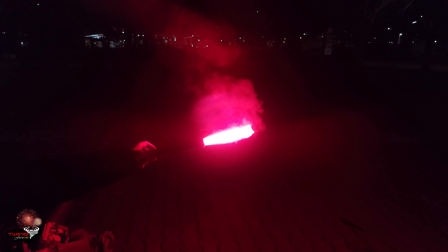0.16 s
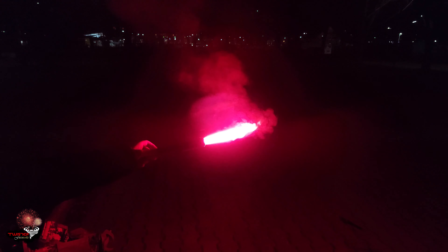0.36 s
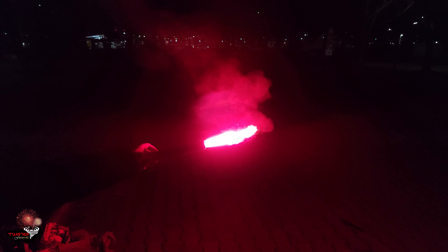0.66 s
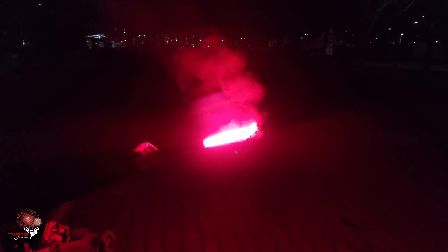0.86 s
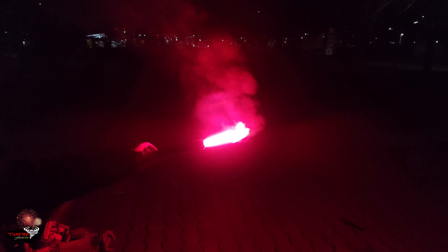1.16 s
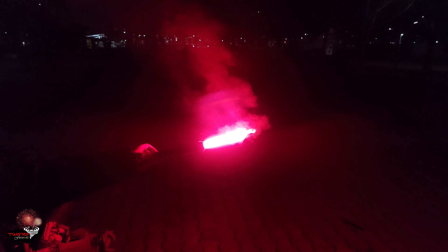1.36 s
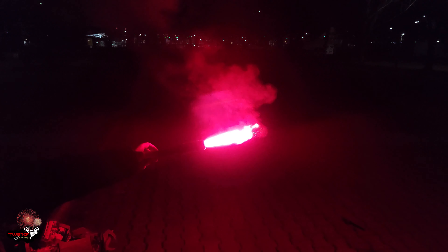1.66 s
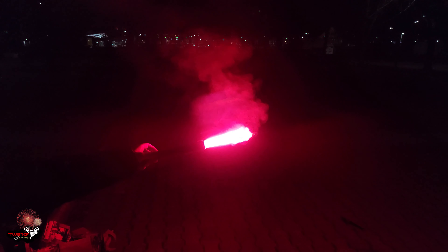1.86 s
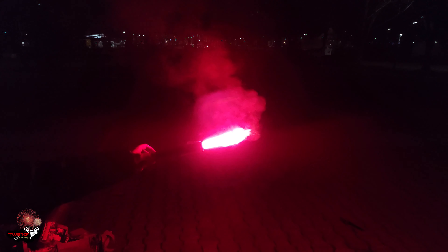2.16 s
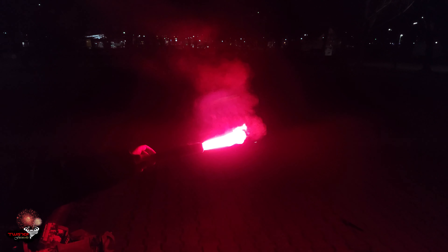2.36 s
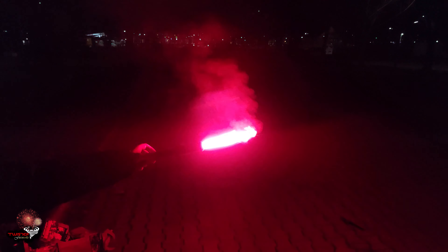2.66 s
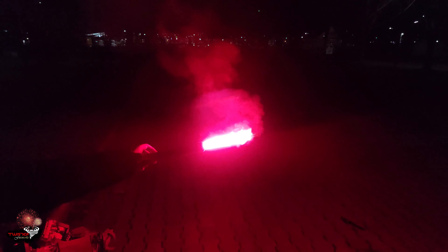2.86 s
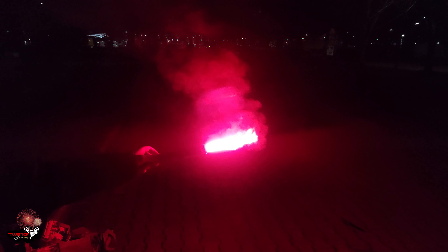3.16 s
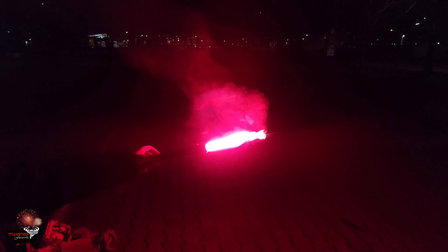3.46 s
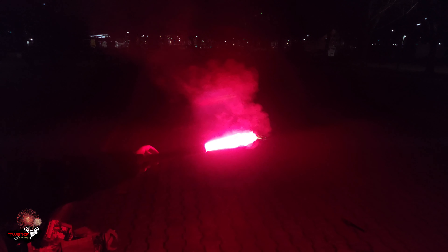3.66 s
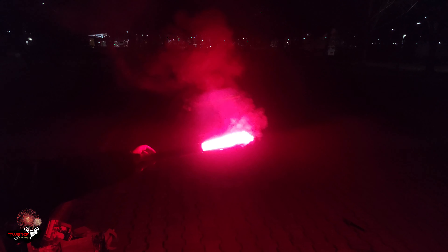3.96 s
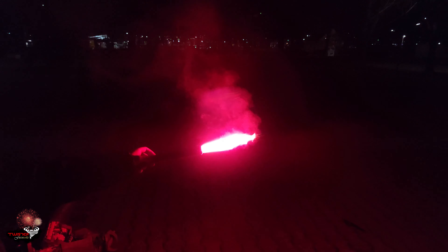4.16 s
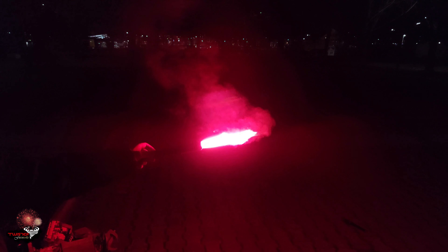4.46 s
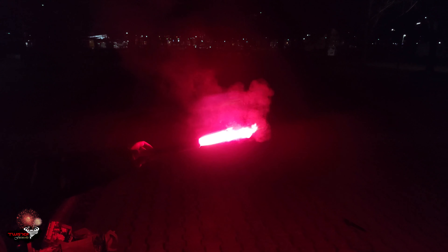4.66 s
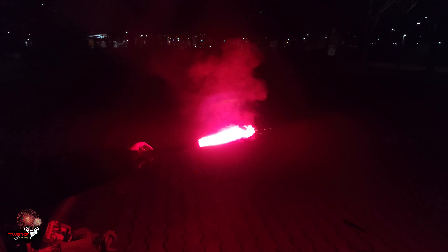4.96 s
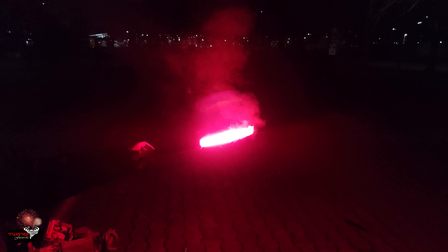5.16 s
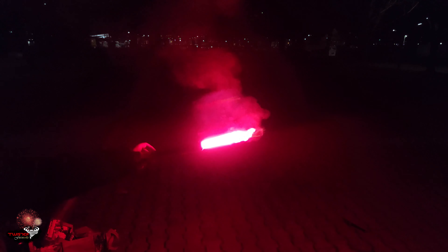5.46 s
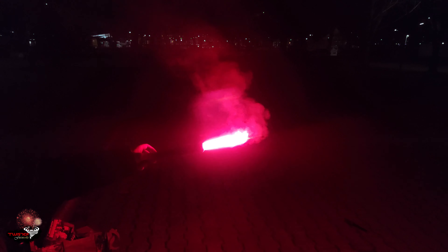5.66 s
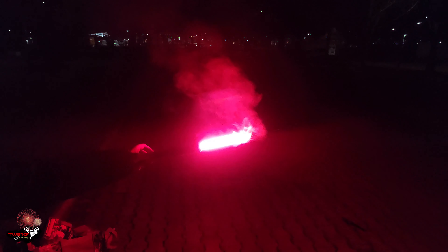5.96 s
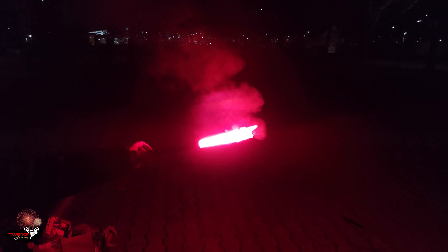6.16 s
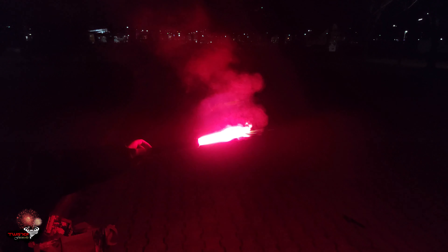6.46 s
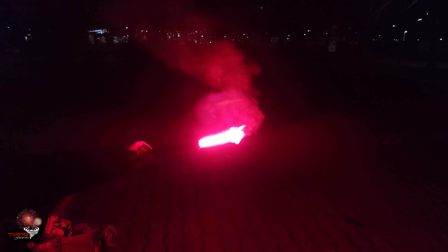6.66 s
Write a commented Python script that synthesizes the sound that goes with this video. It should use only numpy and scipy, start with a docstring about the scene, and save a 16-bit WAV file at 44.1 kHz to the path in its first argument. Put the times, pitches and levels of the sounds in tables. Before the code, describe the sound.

From 0 to about 7 seconds a hand flare burns without pause a few metres away on a paved path outdoors at night. The gas jet gives a rough, airy roar strongest around 1.5 to 3 kHz, with a thinner bright hiss above 4 kHz. Both sputter together very slightly, and the highest treble flutters quickly and randomly. A reflection about 5 milliseconds later colours the rush with a hollow tone that drifts slowly. The roar rises gently and unevenly by a few decibels, with small surges near 5.6 and 6.5 seconds and at the end. Well beneath, a distant town rumbles; soft deep swells come near 1 and 2 seconds, a short thump-like one at 4, and fainter ones near 5.9 and 6.4. A faint low engine drone peaks around 1.8 seconds, then fades. The treble is broad in stereo, the bass nearly central, with a sharp cutoff near 15.7 kHz.

```python
"""A paved path at night: a red hand flare burns a few metres away, a town lies far off.
Flare: coloured noises make the gas jet's roar and hiss, both sputtering together.
A delayed copy off the paving combs them into a hollow tone that drifts as the flare burns down.
Two small microphone ports colour it differently, and the level of each treble region wavers at random.
Town: low noise rumbles and swells, and a two-line engine drone grows and fades."""
import sys
import numpy as np
from scipy.fft import rfft, irfft, next_fast_len
from scipy.io import wavfile
from scipy.ndimage import map_coordinates

SR = 44100
rng = np.random.default_rng(int(sys.argv[2]) if len(sys.argv) > 2 else 0)


def persist_wave(psi):
    """Save psi, clipped to +-1, as 16-bit WAV."""
    counts = np.round(np.clip(psi, -1, 1) * 32767).astype(np.int16)
    wavfile.write(sys.argv[1], SR, np.atleast_2d(counts).T)


N = 300321
TIME = np.arange(N) / SR  # s
SIZE = next_fast_len(N, real=True)
FREQ = np.maximum(np.arange(SIZE // 2 + 1) * SR / SIZE, 1)  # Hz, kept above 0 for the logarithm


def from_db(db):
    """Decibels to amplitude gain."""
    return 10 ** (np.asarray(db) / 20)


def rms_one(x):
    """Scale to unit power over all channels together."""
    return x / np.sqrt(np.mean(x ** 2) + 1e-20)


def over_hz(points):
    """Columns of a table, joined by straight lines over log frequency."""
    hz, *columns = np.transpose(points)
    return np.squeeze([np.interp(np.log(FREQ), np.log(hz), column) for column in columns])


def filtered(x, response):
    """Pass a sound through a frequency response."""
    return irfft(rfft(x, SIZE) * response, SIZE)[..., :N]


def noise(response, channels=1):
    """Unrelated noises of one colour, joint rms 1."""
    white = rng.standard_normal((channels, SIZE))
    coloured = irfft(rfft(white) * response, SIZE)
    return rms_one(coloured[:, :N])


def drift(rate_hz):
    """Random curve, rms 1: low-passed noise."""
    return noise(1 / (1 + (FREQ / rate_hz) ** 2))[0]


def flare():
    """Jet, scattered sound and ground echo, as the two ports pick them up."""
    # sound scattered by hand and case, unrelated at each port: hz, scattered_to_direct_db
    scatter_points = [(250, -15.5), (1500, -12.5), (2450, -11.5), (2820, -6.5), (3200, -10), (3760, -1.5),
                      (4400, 0.5), (4980, -11), (5300, -1.5), (7050, -4), (7500, 4), (7820, -6), (8200, 2),
                      (8600, -13.5), (9680, 11), (11300, -2), (12400, -1), (13500, 6), (14800, 7),
                      (15600, 2)]
    # left port resonances and notches: centre_hz, width_hz, peak_db
    left_resonances = [(3940.0, 420, -7), (5260, 370, 5), (6660.0, 520, -5.5), (7450, 210.0, -9),
                       (9840, 840, -14), (12300, 890.0, 4.5), (14370.0, 1320.0, -6)]
    # right port resonances and notches: centre_hz, width_hz, peak_db
    right_resonances = [(1788, 170, 4.3), (3562, 456, 8), (4050, 120.0, 6.5), (4220.0, 230, -4.5),
                        (5830, 370.0, -6), (7230, 800, 7), (8600, 470, -4.5), (13320.0, 380.0, -5),
                        (14320.0, 1400.0, 9)]
    # phase by which the left port leads: hz, lead_rad
    lead_points = [(800.0, 0.04), (1220.0, 0.73), (1550.0, -0.08), (1900.0, 0.88), (2560.0, 0.31),
                   (2920.0, -1.47), (3200.0, -0.52), (3790.0, -1.52), (4520.0, -3.7), (5180.0, -3.17),
                   (5380.0, -5.09), (5810.0, -3.86), (6090.0, -5.16), (7420.0, -3.68), (7600.0, -2.58),
                   (8310.0, -3.17), (9270.0, -3.22), (9620.0, -4.35), (10250.0, -2.01), (11240.0, -1.42),
                   (12660.0, -2.42), (13020.0, -0.31), (13500.0, -4.2), (15000.0, -3.9), (15370.0, -6.3)]

    gas = burn_down(jet(roar_sputter_db=0.32, hiss_sputter_db=0.47, sputter_hz=22))
    scatter = from_db(over_hz(scatter_points))
    total = np.hypot(1, scatter)  # keeps the summed power
    direct = filtered(gas[0], 1 / total)
    scattered = filtered(gas[1:], scatter / total)
    arriving = direct + scattered
    with_echo = arriving + ground_echo(arriving, sway_ms=0.011)
    wavering = waver_treble(with_echo, depth_db=2.04, rate_hz=19)
    left = port(left_resonances) * np.exp(1j * over_hz(lead_points))
    right = port(right_resonances)
    return filtered(wavering, np.array([left, right]))


def jet(roar_sputter_db, hiss_sputter_db, sputter_hz):
    """Turbulent gas from an unevenly burning charge: one direct and two scattered noises."""
    # colour of the jet's roar: hz, relative_db
    roar_colour = [(60.0, -9.5), (210.0, -6.5), (340.0, -10.5), (520.0, -8.5), (900.0, -6.5),
                   (1360.0, -5.5), (1670.0, -2), (2030.0, -5.5), (2330.0, -0.36), (2790.0, -3.5),
                   (3030.0, -3), (3690.0, -11.5), (4410.0, -19.5), (6500.0, -56.1)]
    # colour of the hiss at the jet's mouth: hz, relative_db
    hiss_colour = [(2000.0, -21), (4290.0, 2.5), (5150.0, -2), (6320.0, 2.5), (7300.0, -0.7),
                   (8280.0, -5.5), (9260.0, -10.5), (10910.0, -2), (12360.0, -4.5), (13140.0, -4.5),
                   (14060.0, -10), (15960.0, -9)]
    # roar grows unevenly as the charge is used up: time_s, level_db (before later colouring)
    roar_level = [(0.2, -40), (0.45, -39), (0.9, -39), (1.1, -38.5), (1.4, -39), (2.1, -38.5), (2.42, -39),
                  (2.65, -38), (3.3, -38), (4.2, -38), (4.9, -37.3), (5.35, -38), (5.6, -36.5),
                  (5.82, -38.4), (6.0, -37.5), (6.5, -36.5), (6.7, -37.5), (6.8, -36)]
    hiss_start_db, hiss_slope_db_per_s = -46.5, -0.04  # before later colouring

    time_s, level_db = np.transpose(roar_level)
    roar_db = np.interp(TIME, time_s, level_db)
    hiss_db = hiss_start_db + hiss_slope_db_per_s * TIME
    sputter = drift(sputter_hz)  # each surge of gas lifts roar and hiss together
    roar_gain = from_db(roar_db + roar_sputter_db * sputter)
    hiss_gain = from_db(hiss_db + hiss_sputter_db * sputter)
    roar = noise(from_db(over_hz(roar_colour)), channels=3) * roar_gain
    hiss = noise(from_db(over_hz(hiss_colour)), channels=3) * hiss_gain
    return roar + hiss


def burn_down(x):
    """Colour changes as the flare burns down: even crossfade from early to late."""
    # change from first to last moment: hz, gain_db
    colour_change = [(330.0, -2.6), (700.0, -2.5), (1200.0, -2.7), (2500.0, -0.1), (3090.0, 0.2),
                     (3750.0, -6.5), (5010.0, -2.5), (6210.0, -1.3), (7420.0, 1), (8520.0, -2),
                     (10290.0, 5.5), (12550.0, 1.5), (14060.0, -5), (15640.0, -5)]
    progress = TIME / TIME[-1]
    half_change = from_db(over_hz(colour_change) / 2)
    early = filtered(x, 1 / half_change)
    late = filtered(x, half_change)
    return (1 - progress) * early + progress * late


def ground_echo(x, sway_ms):
    """Paving returns a recoloured copy, ever sooner as the flame burns back along the tube."""
    # echo strength at each port: hz, left_db, right_db
    paving = [(100.0, -11, -10), (700.0, -7, -6.5), (1480.0, -10.5, -6), (2220, -1.5, -3), (2630, -7.5, -4),
              (2770.0, -17, -12), (2880, -3, -1.5), (3280.0, -2, -2.7), (3750.0, -14.4, -2),
              (3990.0, -7.7, -5), (4450, -17, -4.5), (5570, -2.5, -7), (7150.0, -17, -5.5),
              (8820.0, -8, -4.5), (10870.0, -19, -17), (16020.0, -20.0, -21.1)]
    # phase that the case adds to sound from below: hz, left_rad, right_rad
    case_phase = [(240.0, 1.1, 0.9), (450.0, 0.5, -0.02), (640, -1.2, -0.74), (900.0, 1.1, 0.93),
                  (1270, -0.74, 0.54), (1870, 0.32, 1.15), (2150.0, 0.2, 0.25), (2650, 1.2, 0.8),
                  (2870.0, -2, 3.5), (3110.0, -0.5, 4.5), (3730.0, -2.5, 5), (4180, 1, 6), (4280, 1.5, 6),
                  (5075, -4, 4.5), (5360, 5.8, -1.7), (6050, 2.8, 3), (7010.0, -0.88, 2), (7500, -2, 2.6),
                  (8900, 2.5, 1.5)]
    start_ms, slope_ms_per_s = 4.988, -0.018

    sway = sway_ms * drift(rate_hz=2.1)  # the flame tip wanders
    delay_ms = start_ms + slope_ms_per_s * TIME + sway
    bounced = filtered(x, from_db(over_hz(paving)) * np.exp(1j * over_hz(case_phase)))
    read_at = np.arange(N) - delay_ms * SR / 1000  # samples
    return np.array([map_coordinates(side, [read_at], order=3, mode="mirror") for side in bounced])


def waver_treble(x, depth_db, rate_hz):
    """Treble regions waver separately in level, quickly and at random, the highest most."""
    spacing_hz = 1000
    centres_hz = np.arange(4500, 16000, spacing_hz)
    out = x
    for hz in centres_hz:
        triangle = np.clip(1 - abs(FREQ - hz) / spacing_hz, 0, 1)
        region = filtered(x, triangle)
        gain_db = depth_db * hz / centres_hz[-1] * drift(rate_hz)
        out = out + region * (from_db(gain_db) - 1)
    return out


def port(resonances):
    """Response of one microphone port: bell-shaped peaks and notches in dB."""
    return from_db(sum(db / (1 + (2 * (FREQ - hz) / width_hz) ** 2)
                       for hz, width_hz, db in resonances))


def town(side_db):
    """Far traffic, nearly alike at both ports: steady rumble plus bell-shaped deep swells."""
    # colour of the steady rumble: hz, relative_db
    rumble_colour = [(10, -4.5), (20, -8), (35, -14), (46, -0.5), (60, 1.5), (85, -8), (140, -7), (180, -8),
                     (240, -21), (400, -50)]
    # colour of the deep swells: hz, relative_db
    swell_colour = [(15, -6), (30, -1), (45, 2), (70, -7), (95, -12), (150, -22), (400, -72)]
    # deep swells: peak_s, length_s (between 1/e points), level_db
    swell_times = [(0.95, 0.62, -52), (2.05, 0.67, -49), (4.01, 0.14, -46), (5.877, 0.16, -52),
                   (6.398, 0.28, -54)]
    steady_db = -52.0

    swell_gain = sum(from_db(db) * np.exp(-(2 * (TIME - peak_s) / length_s) ** 2)
                     for peak_s, length_s, db in swell_times)
    steady = from_db(steady_db) * noise(from_db(over_hz(rumble_colour)), channels=2)
    swells = swell_gain * noise(from_db(over_hz(swell_colour)), channels=2)
    mid, side = steady + swells
    return mid + from_db(side_db) * np.array([side, -side])


def engine(waver):
    """Far engine passing: low sines of slightly wavering speed, amplitude inverse to distance."""
    # lines of the drone: pitch_hz, relative_db
    drone_lines = [(57, -2), (114.5, 1.5)]
    nearest_s, half_power_s = 1.83, 0.5  # half_power_s: from nearest to half power
    gain_db = -56  # when nearest, added to each line's level

    run_s = np.cumsum(1 + waver * drift(rate_hz=2.7)) / SR
    drone = sum(from_db(db) * np.sqrt(2) * np.sin(2 * np.pi * hz * run_s) for hz, db in drone_lines)
    distance = np.hypot(1, (TIME - nearest_s) / half_power_s)  # 1 when nearest
    return from_db(gain_db) * drone / distance


def scene():
    """Flare in front of the night town."""
    return flare() + town(side_db=-13.5) + engine(waver=0.018)


def record(dry):
    """Steep treble cut: straight-line fall to zero over 100 Hz."""
    cutoff_hz, width_hz = 15750, 100
    return filtered(dry, np.clip((cutoff_hz - FREQ) / width_hz + 0.5, 0, 1))


dry = scene()
out = record(dry)
persist_wave(out)
```